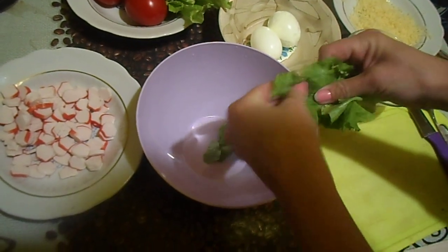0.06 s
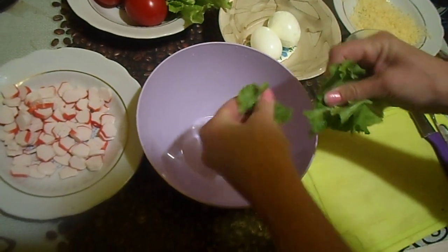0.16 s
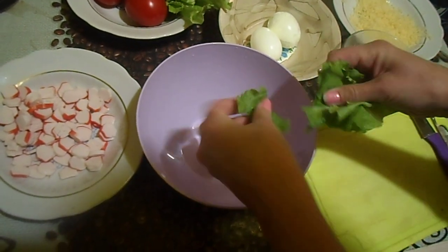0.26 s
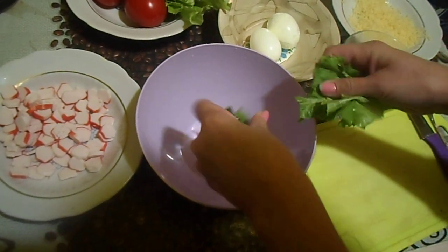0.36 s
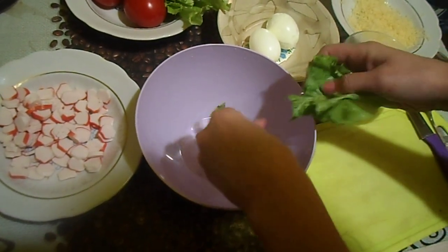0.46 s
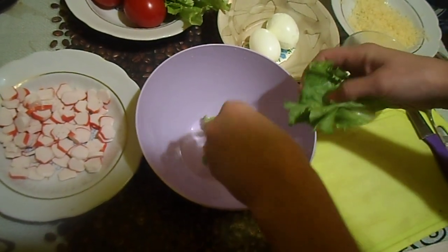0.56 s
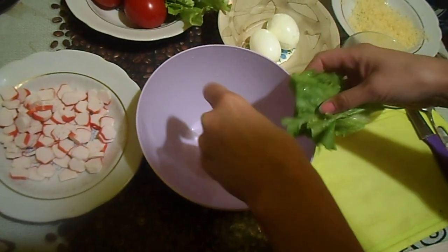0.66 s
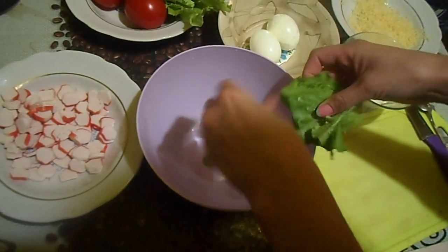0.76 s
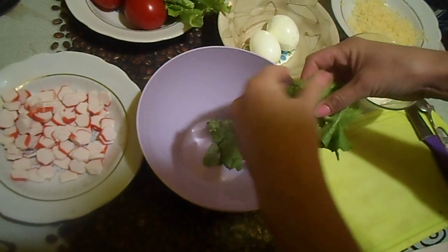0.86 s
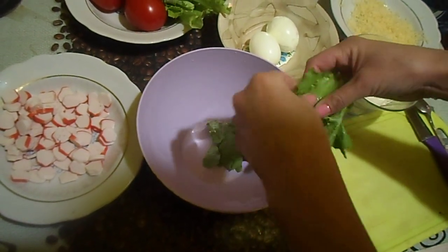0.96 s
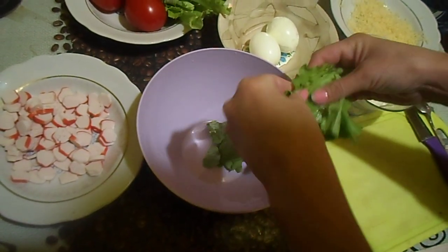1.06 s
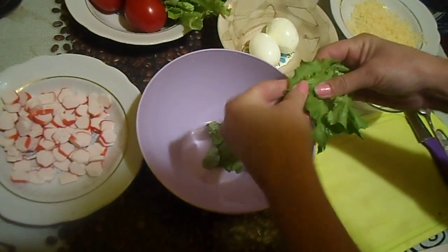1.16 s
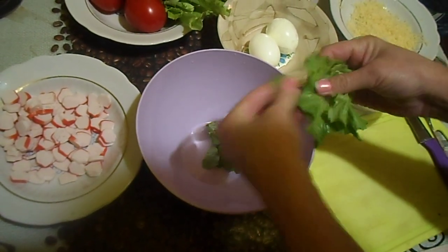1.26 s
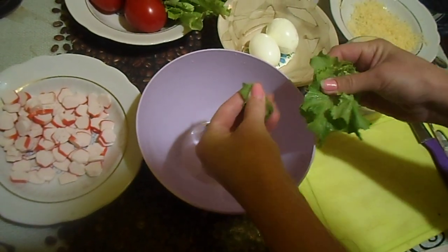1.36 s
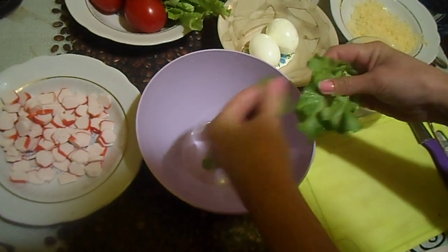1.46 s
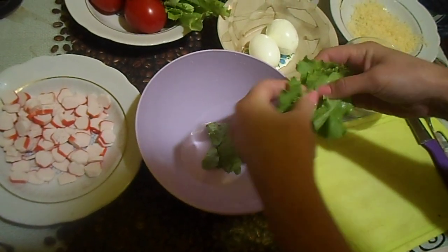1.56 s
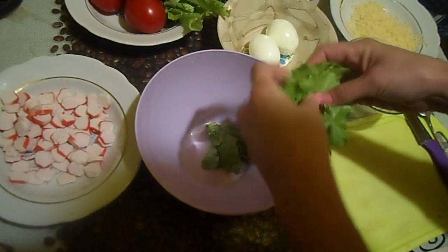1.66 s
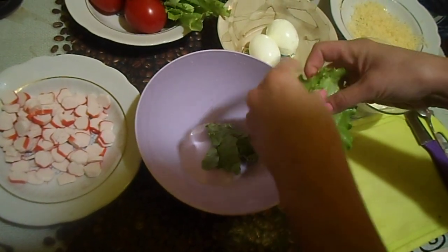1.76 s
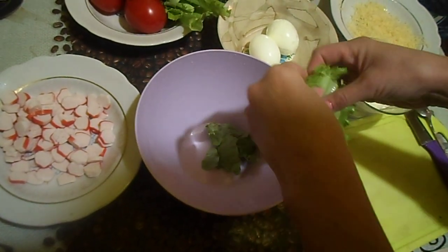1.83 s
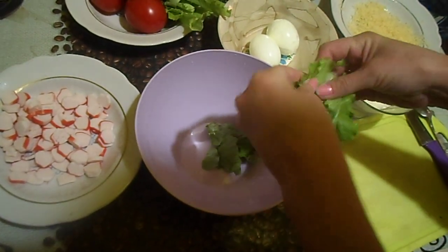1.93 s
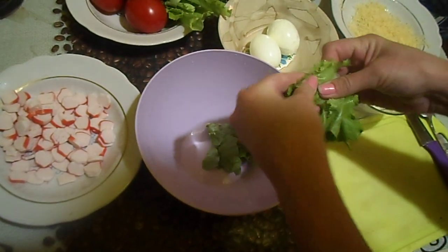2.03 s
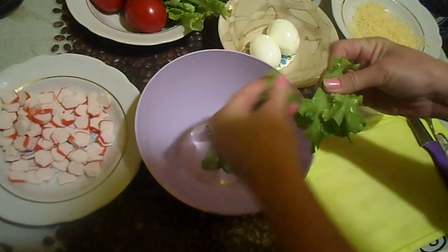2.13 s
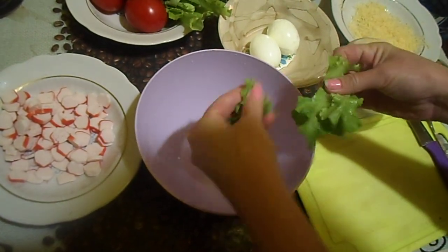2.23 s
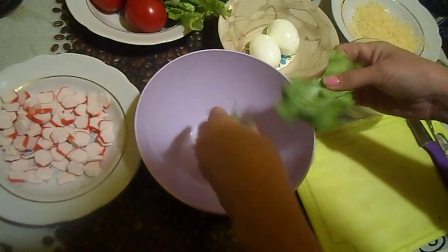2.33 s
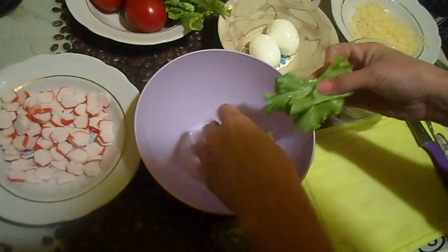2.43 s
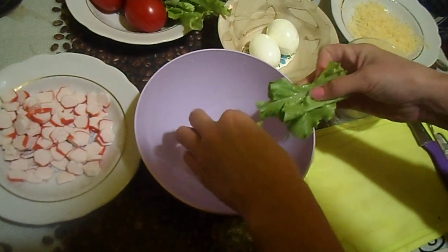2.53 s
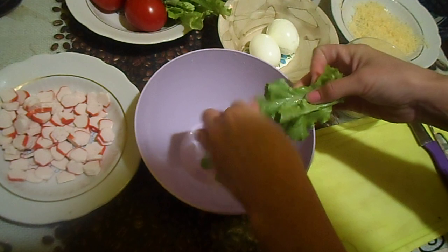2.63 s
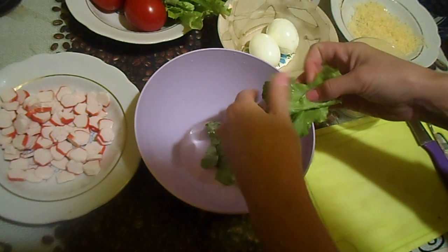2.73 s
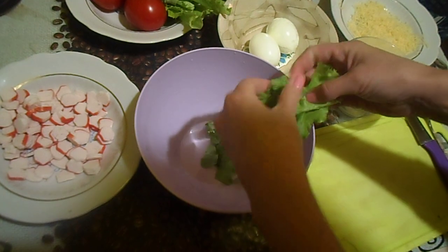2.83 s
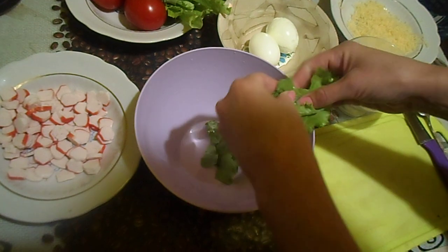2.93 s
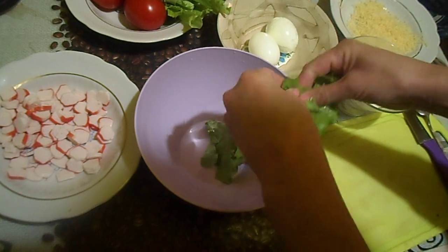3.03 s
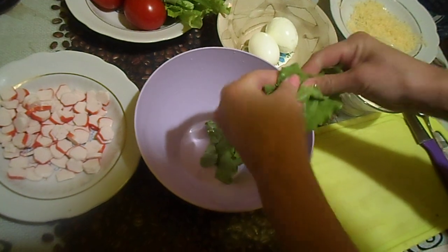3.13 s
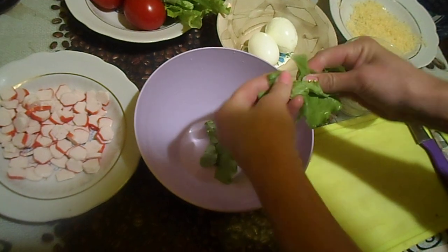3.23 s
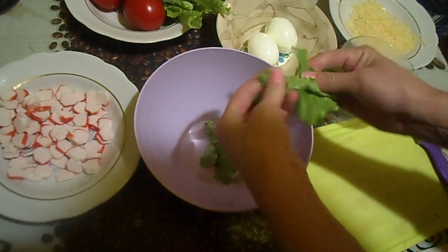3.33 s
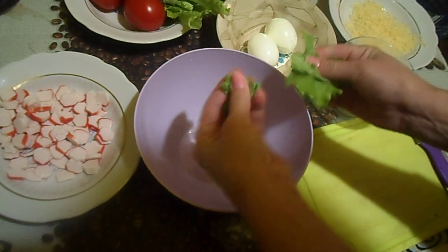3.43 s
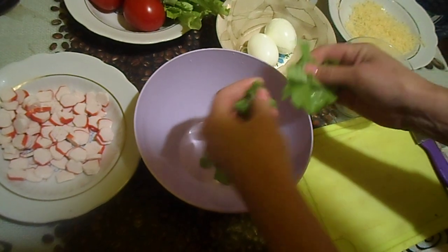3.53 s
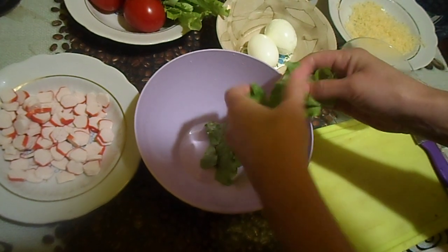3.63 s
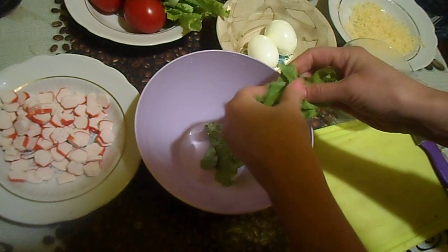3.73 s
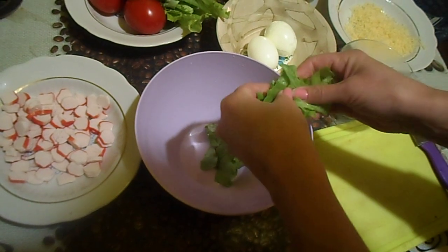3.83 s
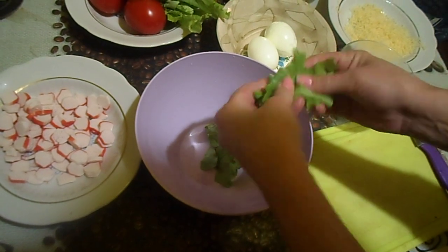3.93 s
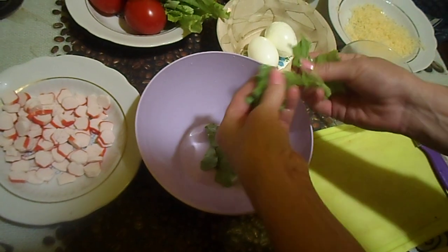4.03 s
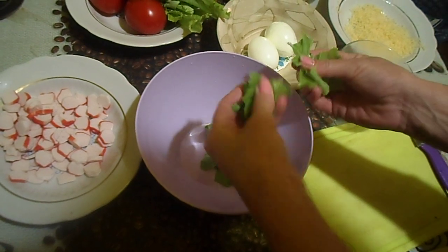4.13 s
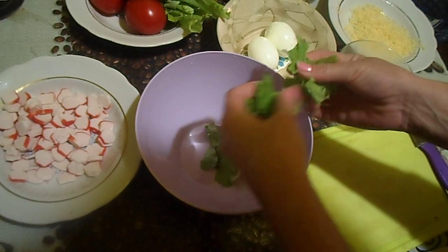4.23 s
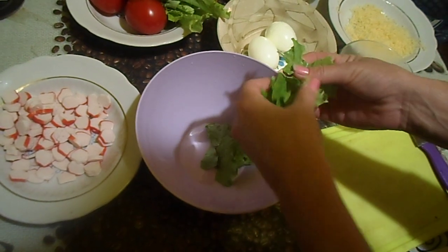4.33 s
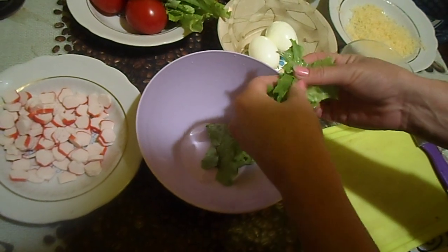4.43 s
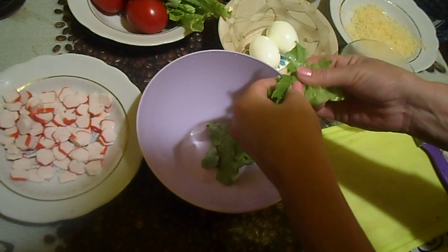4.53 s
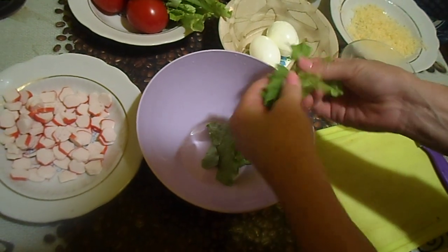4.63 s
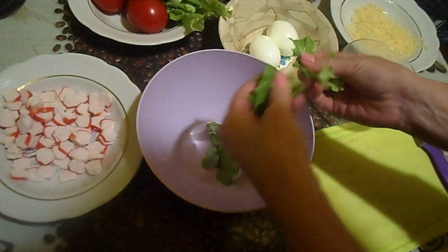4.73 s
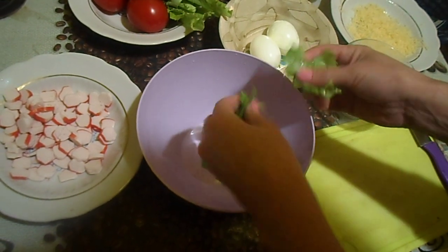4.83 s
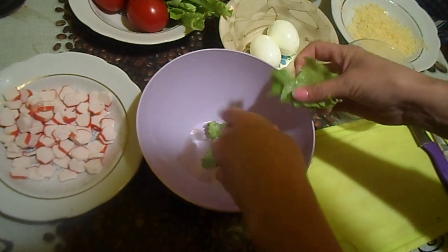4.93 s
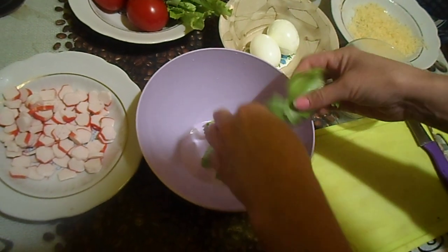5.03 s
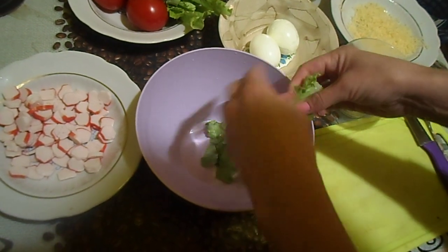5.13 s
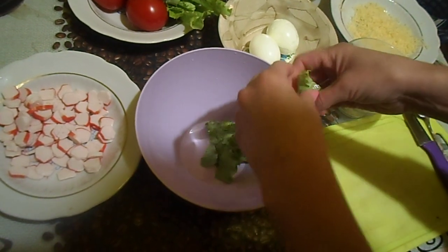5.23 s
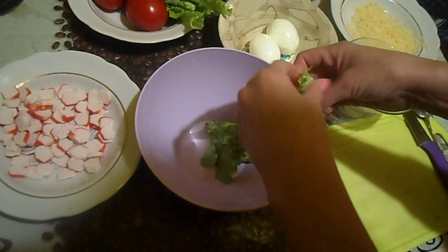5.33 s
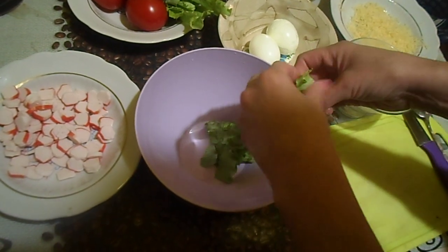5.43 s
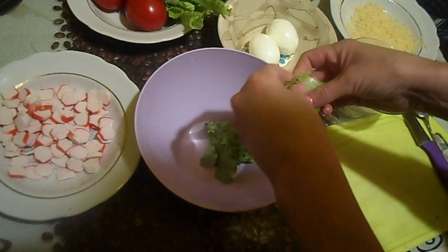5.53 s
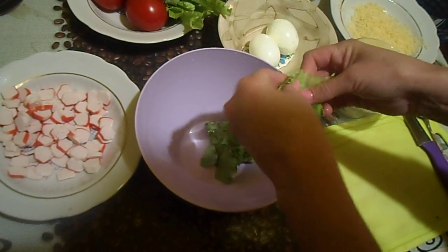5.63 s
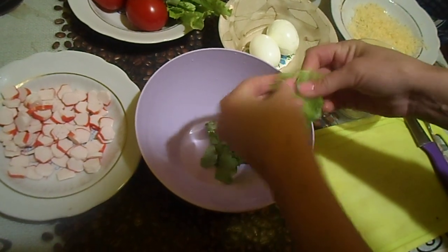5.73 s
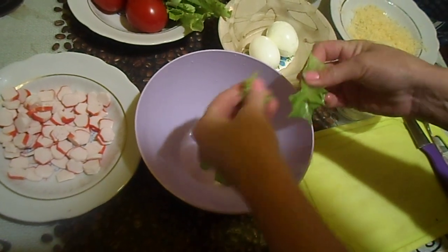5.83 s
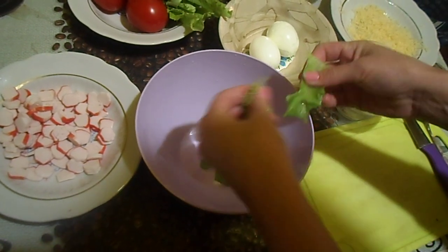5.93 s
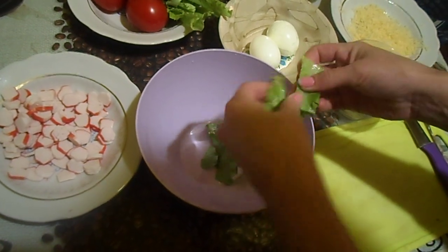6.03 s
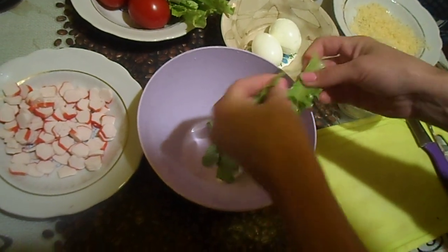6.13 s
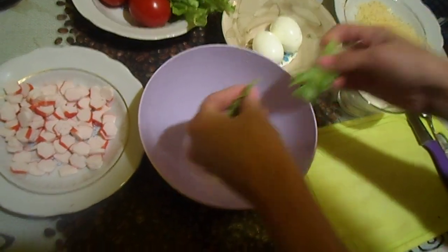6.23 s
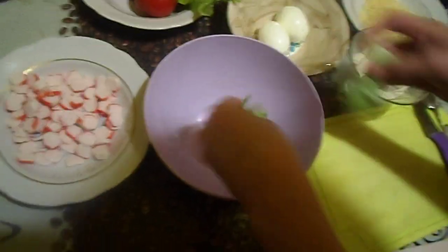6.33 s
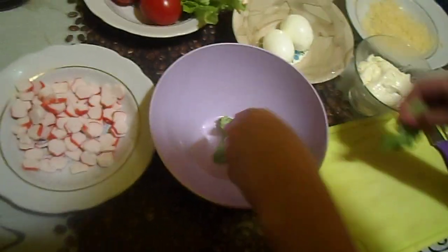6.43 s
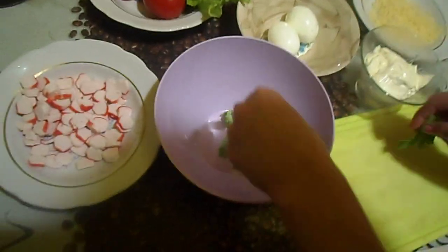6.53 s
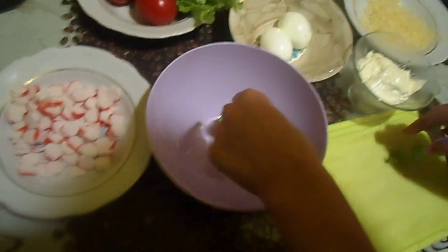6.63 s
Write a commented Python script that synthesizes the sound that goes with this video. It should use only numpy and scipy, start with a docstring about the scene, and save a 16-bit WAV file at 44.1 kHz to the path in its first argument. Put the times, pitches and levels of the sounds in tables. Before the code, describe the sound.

A constant coloured hiss, like a machine running, and a faint deep hum fill the background. Close up, crisp lettuce leaves rip in short bursts of about a tenth of a second, with snapping veins, dry ticks and a thin crunchy fizz. Light rubbing of leaves fills some gaps. The room adds only a brief soft tail. After the last double tear there is a faint rub and a late small tick.

```python
"""A steady machine-like hiss, coloured by many narrow resonances, and a low 30 Hz hum run throughout.
From a quarter of a second on, two hands tear crisp lettuce leaves close to a microphone in a small kitchen.
Each tear is a burst of snapping veins, ringing noise bursts, over a fine rip of bursting cells, clumped clicks.
Between the tears fingers rub the leaves, as softer bands of clicks; a short noise tail is the room's answer.
The hum drops out briefly at a steady pace, and the last tear gives way to a faint rub and one late, weak snap."""
import sys
import numpy as np
from scipy import signal
from scipy.fft import rfft, irfft, next_fast_len
from scipy.io import wavfile

SR = 44100
rng = np.random.default_rng(int(sys.argv[2]) if len(sys.argv) > 2 else 0)


def to_wav(sig):
    """Store sig (one row per channel, or 1-D mono) as 16-bit WAV at the path in sys.argv[1].

    Samples outside -1..1 are clipped; the rate is SR.
    """
    pcm = np.clip(np.atleast_2d(sig), -1, 1) * 32767
    pcm = np.round(pcm).astype(np.int16)
    wavfile.write(sys.argv[1], SR, pcm.T)  # frames by channels


N = 294251

# broad colour of the hiss: (frequency [Hz], relative power density [dB])
HISS_SLOPE = [(12, -14), (25, 2.5), (82, -2.5), (300, -17), (900, -15.5), (1300, -9.5), (1750, -23),
              (3200, -24.5), (4500, -16), (6300, -21.5), (7400, -32), (8700, -18), (10100, -23),
              (11100, -45), (12400, -49)]
# narrow resonances added to it: (frequency [Hz], width [Hz], relative power density at the top [dB])
HISS_RESONANCES = [(547, 25, -10), (822, 8.3, -6), (985.4, 8.5, 0), (1067, 6.5, -4), (1092.5, 24, -3),
                   (1210, 113, -6.5), (1272, 25.4, -1), (1328, 12, -2.5), (1480, 8.3, -12), (1484, 75, -11),
                   (1610, 27, -9), (2500, 20, -14), (2550, 34, -22), (2700, 13, -15.5), (3705, 72, -14),
                   (4197, 28, -5), (4290, 130, -14), (4470, 27, -30), (5206, 150, -12), (5320, 10, -1.5),
                   (5615, 110, -13), (6420, 135, -16), (8335, 210, -11.5), (10486, 185, -19.5),
                   (11570, 115, -28.5), (12100, 300, -59)]
# veins that snap loudest: (time [s], length [ms], peak of thud [dB], of rib crunch [dB], of skin tick [dB])
LOUD_VEINS = [(0.2576, 1.8, -45, -33, -23), (0.2676, 0.32, -25, -20.5, -8.5), (0.2825, 0.74, -31, -48, -20),
              (0.2902, 0.76, -50, -27, -35), (0.3051, 0.5, -40, -37, -26), (0.3132, 1, -55, -45, -29),
              (1.3076, 0.9, -58, -53, -29.5), (1.4473, 2.3, -29, -28, -25), (1.4513, 0.96, -47, -26, -26),
              (1.4582, 1.8, -50, -48, -32), (1.4664, 2, -40, -41, -39), (1.4806, 1.8, -29, -29.5, -25.5),
              (2.2327, 0.92, -55, -35, -29), (2.2535, 2, -26.5, -20.5, -40), (2.2671, 0.92, -51, -28, -30),
              (2.2705, 1.7, -45, -35, -25), (2.2808, 1.8, -50, -29, -28), (2.2918, 1.4, -35, -31, -33),
              (2.2957, .8, -43, -43, -28), (2.3247, .9, -54, -42, -37), (3.3802, 0.7, -52, -37, -22),
              (3.3933, 1.6, -34, -22, -23), (3.3958, 1.45, -36.5, -22, -8), (3.404, 1.4, -44, -40, -30),
              (3.4923, 0.72, -56, -32.5, -23), (3.5362, 0.83, -47, -42, -20),
              (3.5388, 1.1, -39, -26, -21.5), (3.5494, 0.95, -34, -45, -29), (3.564, 0.52, -39, -28, -16.5),
              (4.1249, 1.6, -38.5, -34.5, -24), (4.1428, 0.32, -41, -40, -18.5),
              (4.1645, 1.3, -49, -29, -22), (4.1693, 0.57, -34.5, -29, -13.5), (4.1737, 2.8, -41, -39, -28),
              (4.1894, 3.7, -52, -35, -30), (4.1991, .7, -51, -42, -25), (4.2074, 1.2, -40, -33, -9),
              (4.2146, 1.2, -49, -48, -26), (4.2248, 0.65, -46, -32.5, -21), (4.7935, 0.97, -45, -51, -29),
              (4.7983, 1.5, -43, -29.5, -17), (4.8073, 0.4, -29.5, -36, -18), (4.8169, .6, -56, -39, -25),
              (4.82, 0.7, -50, -40, -22), (4.8283, 1.2, -37, -48, -17.5), (4.8321, 1.5, -55, -37, -20),
              (5.8966, 0.6, -53, -54, -32), (5.9228, 0.55, -37, -36, -26), (5.9257, 1.9, -26, -19, -12),
              (5.9381, 0.39, -40, -40, -6), (5.9693, 0.7, -38, -47, -17), (5.9761, 1.4, -51, -40, -28),
              (6.6614, 0.82, -65, -54, -24.5)]
# bands where a snap rings, in the order thud, crunch, crack, tick: (centre [Hz], width [Hz])
SNAP_BANDS = [(900, 1130), (2700, 1510), (5300, 1960), (9200, 3670)]
# ripping tissue: (time [s], rise [ms], fall [ms], fizz [dB], crackle [dB],
#                  tick of the small veins [dB], crispness of this leaf [dB])
TEARS = [(.268, 12, 74, -43, -51.5, -38, -2), (1.447, 9.9, 32, -39.5, -48.5, -40, -1.5),
         (2.265, 19.5, 63, -38.5, -45.5, -33, -1.5), (3.395, 13.3, 52, -37.5, -63, -37, -4.5),
         (3.545, 8, 42, -47, -57, -34, -1.5), (4.2, 26, 42, -45, -55, -33, 0),
         (4.81, 12, 34, -50, -56, -31, 2), (5.85, 35, 36, -52, -74, -35, -4),
         (5.93, 33, 35, -39, -72, -33, -4.5)]
# fingers rubbing the leaves: (time [s], half length [ms], centre [Hz], level before the band filter [dB])
RUBS = [(.925, 12, 6650, -46), (1.13, 87, 5970, -55), (2.06, 10, 7000, -55), (2.147, 5, 7300, -45),
        (2.46, 53, 7500, -51.5), (2.965, 24, 5400, -49.5), (3.27, 10, 10500, -49), (3.76, 78, 8000, -51.5),
        (3.95, 36, 6500, -52.5), (4.07, 10, 8540, -47), (4.62, 15, 8040, -49), (4.7, 15, 8500, -48),
        (6.26, 13, 6940, -46)]

HISS_DB, HISS_END_HZ = -49, 12400
HUM_HZ, HUM_DB, HUM_WAVER_DB = 30, -51.5, 2.5
FIRST_DIP_S, DIP_EVERY_S, DIP_HALF_S = 0.3, 1.7, 0.049
FIRST_BREAK = 12   # strength of the break in a 1 ms snap, against the stray fibres
VEIN_SPREAD_DB = 3.5   # the crack differs from vein to vein
CRACK_FROM_TICK = 0.32   # the crack lies this share of the way from crunch to tick, in dB
# small veins: thud and crunch are set against the crackle of their rip
SMALL_PER_RIP, SMALL_MS, SMALL_SPREAD_DB = 9, 0.77, 3
SMALL_THUD_DB, SMALL_CRUNCH_DB = 5.5, 10.5
RIP_PER_S, RUSTLE_PER_S = 6000, 1800   # typical rate of bursting cells, before they clump
KITCHEN_T60_S, KITCHEN_DB, WALL_CUT_HZ = 0.25, -8, 10300
RUSTLE_WIDTH_HZ, WIDER_HZ_PER_MS = 2200, 90   # a longer rub is broader
MIC_STOP_HZ, MIC_TOP_HZ, MIC_TOP_DB = 11040, 11540, -14
CUTOFF_HZ = 13100


def from_db(db):
    """dB to gain."""
    return 10 ** (np.asarray(db) / 20)


def rms_one(x):
    """Scale to rms 1."""
    return x / np.sqrt(np.mean(x ** 2) + 1e-20)


def band(x, low_hz, high_hz):
    """Band-pass filter."""
    edges = [max(low_hz, 50), min(high_hz, 15000)]
    return signal.sosfilt(signal.butter(2, edges, "band", fs=SR, output="sos"), x + 1e-18)


def drift(corner_hz):
    """Slow random wander of rms 1: low-passed noise, drawn every 40 samples."""
    r = np.exp(-80 * np.pi * corner_hz / SR)
    noise = rng.standard_normal(N // 40 + 2002)
    slow = signal.lfilter([1], [1, -2 * r, r * r], noise)[2000:]
    return np.interp(np.arange(N) / 40, np.arange(len(slow)), rms_one(slow))


def grains(per_s, spread_db):
    """Random clicks of uneven size and either sign that come in clumps."""
    born = rng.random(N) < per_s * from_db(4.0 * drift(60)) / SR
    size = from_db(spread_db * np.minimum(rng.exponential(1, N), 4))
    return born * size * rng.choice([-1, 1], N)


def swell(s, rise_ms, fall_ms):
    """A bell-shaped rise and fall around a moment."""
    t = (np.arange(N) / SR - s) * 1000
    return np.exp(-(t / np.where(t < 0, rise_ms, fall_ms)) ** 2)


def hiss():
    """Noise whose power is a broad slope plus narrow resonances."""
    size = next_fast_len(N)
    hz = np.maximum(np.arange(size // 2 + 1) * SR / size, 1)
    points = np.array(HISS_SLOPE)
    power = from_db(np.interp(np.log(hz), np.log(points[:, 0]), points[:, 1])) ** 2
    for mode_hz, width_hz, top_db in HISS_RESONANCES:
        power += from_db(top_db) ** 2 / (1 + (2 * (hz - mode_hz) / width_hz) ** 2) ** 2
    spectrum = rfft(rng.standard_normal(size)) * np.sqrt(power) * (hz < HISS_END_HZ)
    return from_db(HISS_DB) * rms_one(irfft(spectrum, size)[:N])


def hum():
    """A low steady sine that wavers in level and drops out briefly at a steady pace."""
    t = np.arange(N) / SR
    from_dip = (t - FIRST_DIP_S + DIP_EVERY_S / 2) % DIP_EVERY_S - DIP_EVERY_S / 2
    gain = from_db(HUM_DB + HUM_WAVER_DB * drift(3.2))
    gain = gain * (1 - np.exp(-(from_dip / DIP_HALF_S) ** 2))
    return np.sqrt(2) * gain * np.sin(2 * np.pi * HUM_HZ * t)


def small_snaps():
    """Small veins scattered at random over the rise and fall of each rip, weaker away from its peak."""
    veins = []
    luck = rng.standard_normal((len(TEARS), SMALL_PER_RIP, 5))
    for (s, rise_ms, fall_ms, _, crackle_db, tick_db, _), rows in zip(TEARS, luck):
        for place, size, deep, low, high in rows:
            side_ms = rise_ms if place < 0 else fall_ms
            veins.append((
                s + place * side_ms / 1000,
                SMALL_MS * np.exp(0.47 * size),
                crackle_db + SMALL_THUD_DB + SMALL_SPREAD_DB * deep - 2.6 * place ** 2,
                crackle_db + SMALL_CRUNCH_DB + SMALL_SPREAD_DB * low - 2.2 * place ** 2,
                tick_db + SMALL_SPREAD_DB * high - 4.0 * place ** 2))
    return veins


def snaps():
    """A vein parts with one sharp break, then stray fibres follow; each part rings for a few cycles."""
    veins = LOUD_VEINS + small_snaps()
    out, span = np.zeros(N + 1024), np.arange(1024) / SR
    luck = rng.standard_normal((len(veins), 1025))
    for (s, length_ms, thud_db, crunch_db, tick_db), row in zip(veins, luck):
        fibres, crack_luck_db = row[1:], VEIN_SPREAD_DB * row[0]
        crisp_db = min(TEARS, key=lambda tear: abs(tear[0] - s))[-1]   # from the nearest rip
        crack_db = crunch_db + CRACK_FROM_TICK * (tick_db - crunch_db) + crisp_db + crack_luck_db
        levels_db = (thud_db, crunch_db, crack_db, tick_db)
        # a quick fade with a faint, longer tail
        fading = np.exp(-(1000 * span / length_ms) ** 2) + .05 * np.exp(-span / .004)
        breaking = fibres * np.abs(fibres) * fading   # a few fibres are much stronger than the rest
        breaking[0] = -FIRST_BREAK / np.sqrt(length_ms)
        at = min(int(s * SR), N - 1)
        for (hz, width_hz), level_db in zip(SNAP_BANDS, levels_db):
            part = band(breaking, hz - width_hz / 2, hz + width_hz / 2)
            out[at:at + 1024] += from_db(level_db) * part / np.abs(part).max()
    return out[:N]


def rip():
    """Cells burst densely along the tear line: a bright fizz and a duller crackle."""
    cells = grains(RIP_PER_S, spread_db=8.0)
    fizz = rms_one(band(cells, 7600, 12300))
    crackle = rms_one(band(cells, 660, 4300))
    out = np.zeros(N)
    for s, rise_ms, fall_ms, fizz_db, crackle_db, *_ in TEARS:
        tissue = from_db(fizz_db) * fizz + from_db(crackle_db) * crackle
        out += swell(s, rise_ms, fall_ms) * tissue
    return out


def kitchen(x):
    """The room's brief answer: a diffuse tail of band-limited, decaying noise."""
    t = np.arange(int(.5 * SR)) / SR
    onset = np.minimum(t / 0.00044, 1)
    white = rng.standard_normal(len(t)) * onset * from_db(-60 * t / KITCHEN_T60_S)
    tail = band(white, 320, WALL_CUT_HZ)
    tail = tail / np.sqrt(np.sum(tail ** 2))
    return from_db(KITCHEN_DB) * signal.fftconvolve(x, tail)[:N]


def rustle():
    """Fingertips rub the leaves: sparser bursting cells, swelling in a band of their own for each rub."""
    cells, out = rms_one(grains(RUSTLE_PER_S, spread_db=5.0)), np.zeros(N)
    for s, length_ms, hz, level_db in RUBS:
        near = slice(int((s - .2) * SR), int((s + .2) * SR))
        rubbing = (cells * swell(s, length_ms, length_ms))[near]
        width_hz = RUSTLE_WIDTH_HZ + WIDER_HZ_PER_MS * length_ms
        out[near] += from_db(level_db) * band(rubbing, hz - width_hz / 2, hz + width_hz / 2)
    return out


def capsule(x):
    """The microphone capsule fades steeply at its upper edge, with one weak peak above."""
    low = signal.sosfilt(signal.cheby2(10, 35.0, MIC_STOP_HZ, fs=SR, output="sos"), x)
    peak = x
    for _ in range(2):   # filtered twice for steeper sides
        peak = band(peak, MIC_TOP_HZ - 500, MIC_TOP_HZ + 500)
    return low + from_db(MIC_TOP_DB) * peak


def scene():
    """Leaves in the room as the capsule hears them, over hiss and hum."""
    leaves = snaps() + rip() + rustle()
    heard = capsule(leaves + kitchen(leaves))
    return (heard + hiss() + hum())[None]


def record(dry):
    """Cut the top of the whole mix with a steep low-pass."""
    return signal.sosfilt(signal.ellip(10, .5, 60, CUTOFF_HZ, fs=SR, output="sos"), dry)


dry = scene()
out = record(dry)
to_wav(out)
```